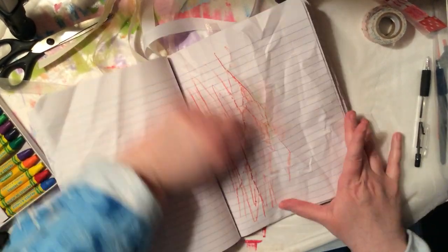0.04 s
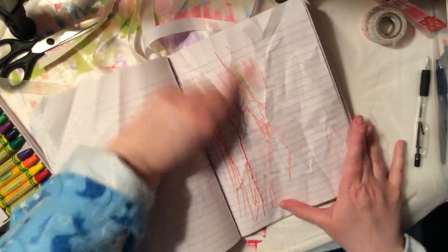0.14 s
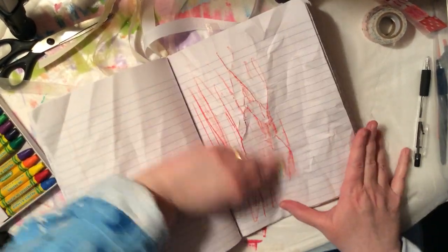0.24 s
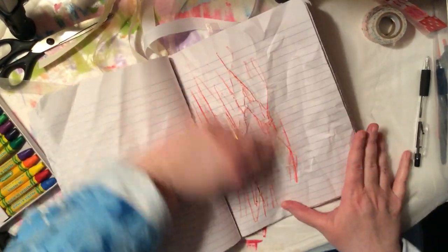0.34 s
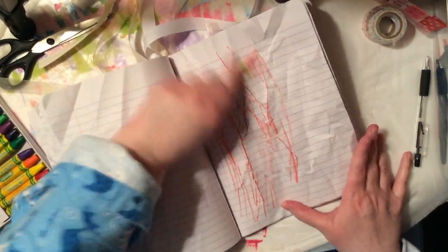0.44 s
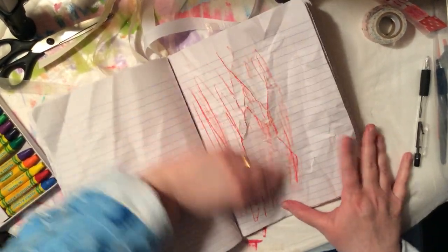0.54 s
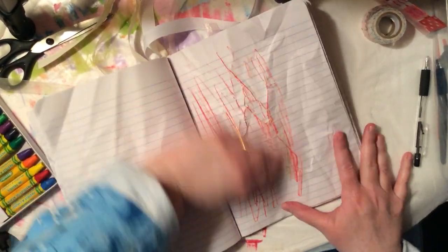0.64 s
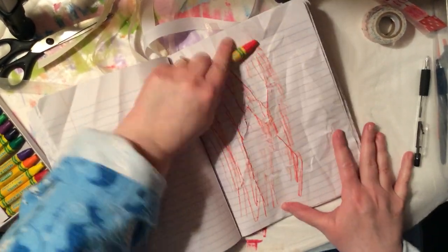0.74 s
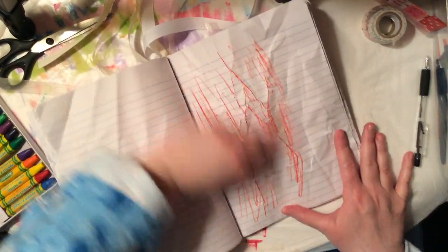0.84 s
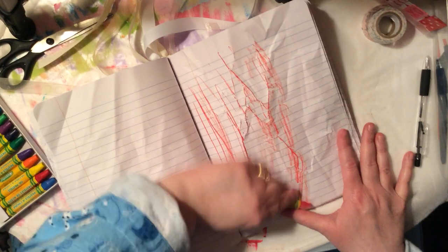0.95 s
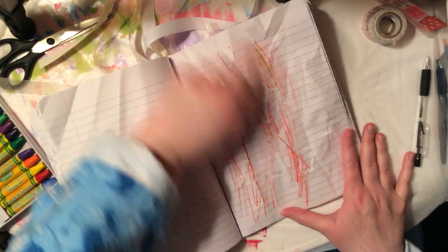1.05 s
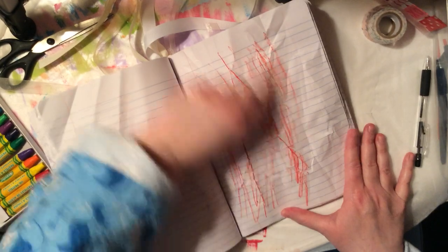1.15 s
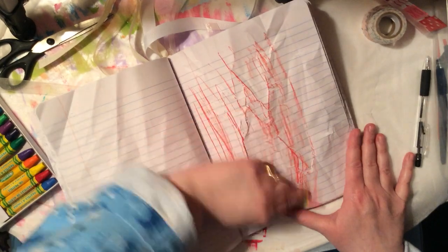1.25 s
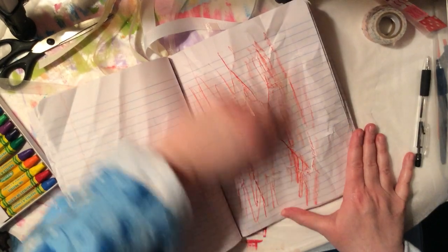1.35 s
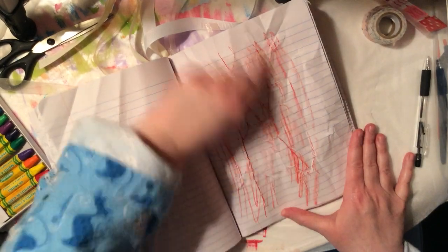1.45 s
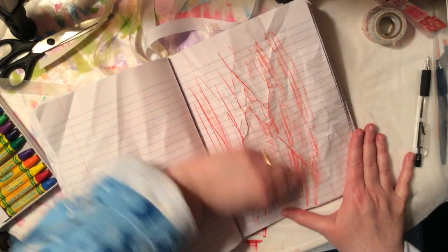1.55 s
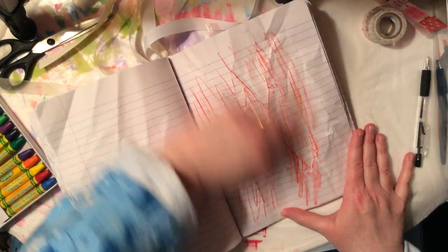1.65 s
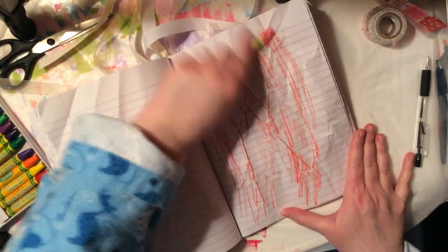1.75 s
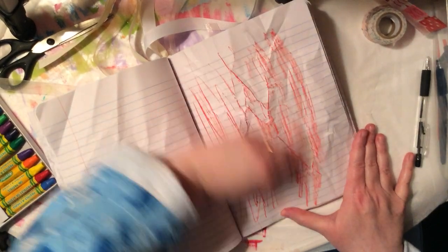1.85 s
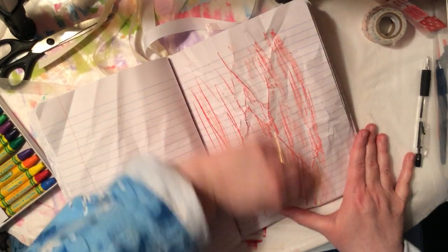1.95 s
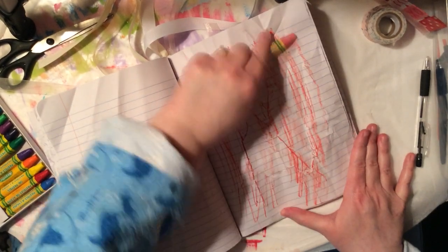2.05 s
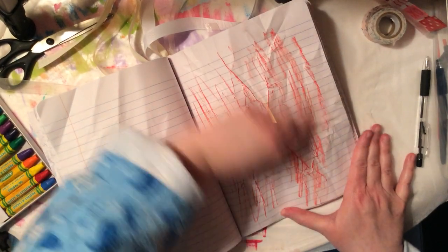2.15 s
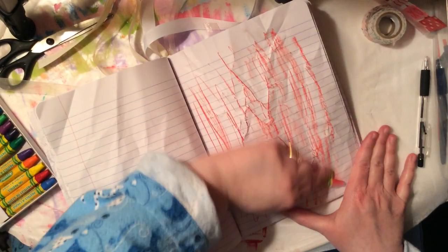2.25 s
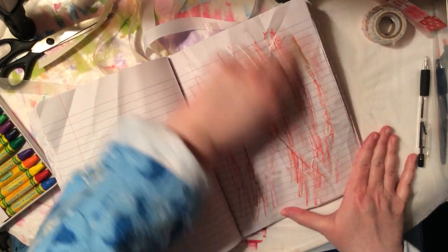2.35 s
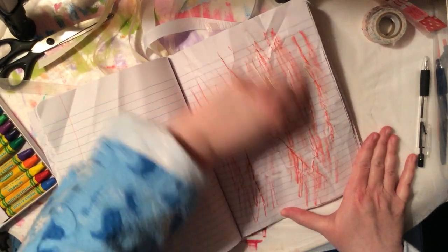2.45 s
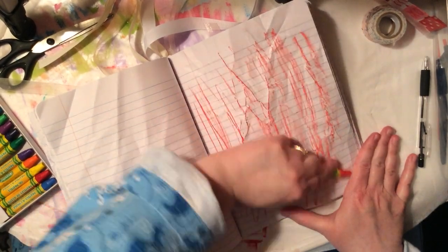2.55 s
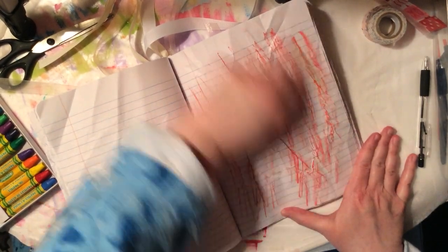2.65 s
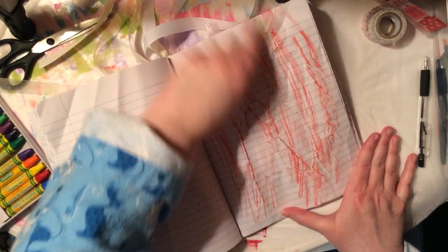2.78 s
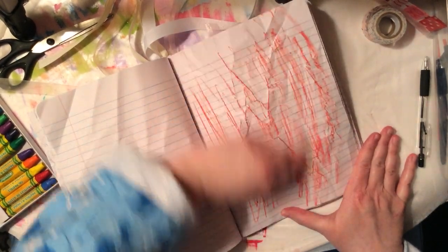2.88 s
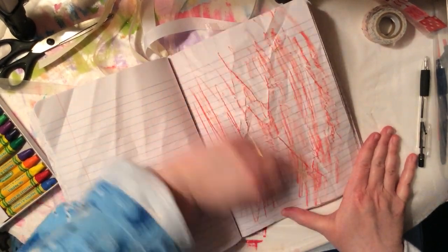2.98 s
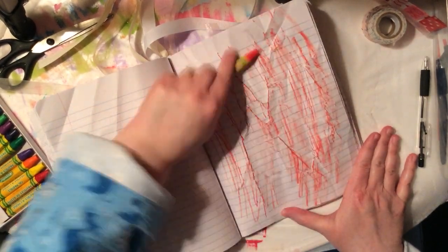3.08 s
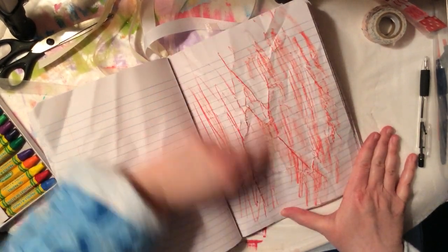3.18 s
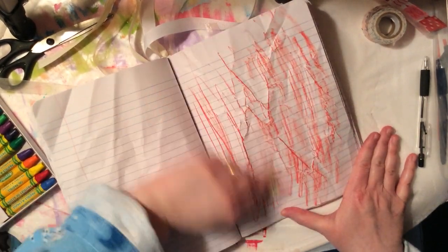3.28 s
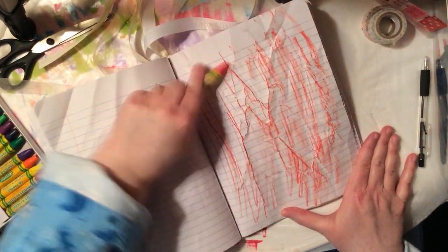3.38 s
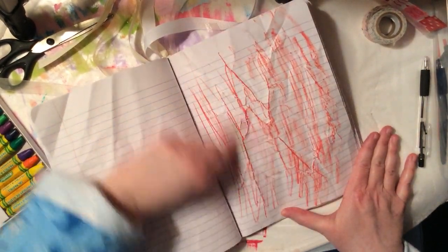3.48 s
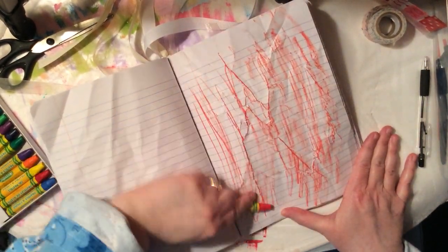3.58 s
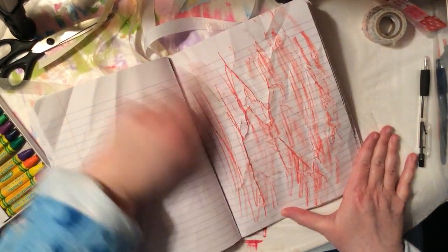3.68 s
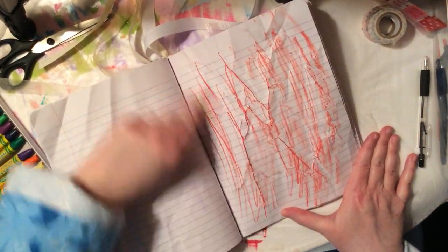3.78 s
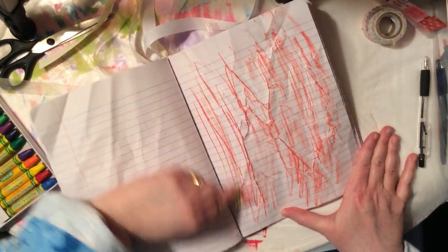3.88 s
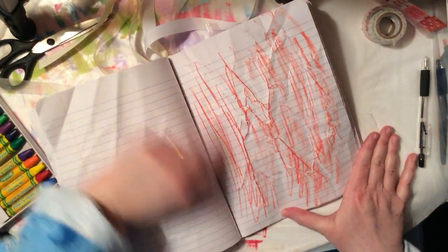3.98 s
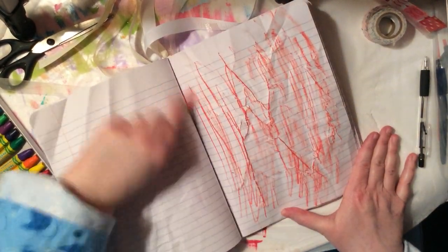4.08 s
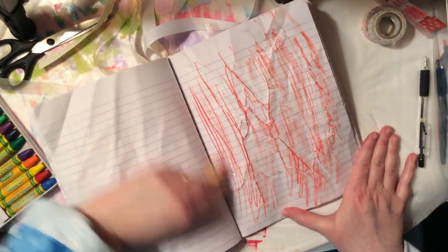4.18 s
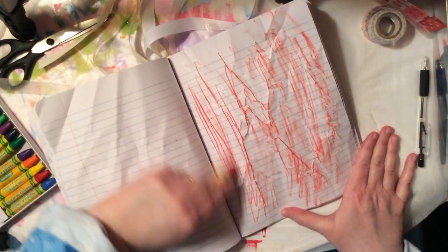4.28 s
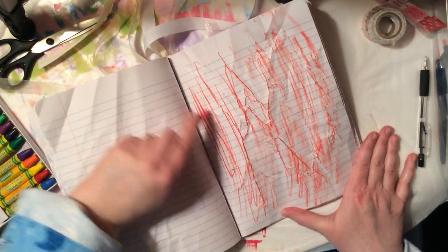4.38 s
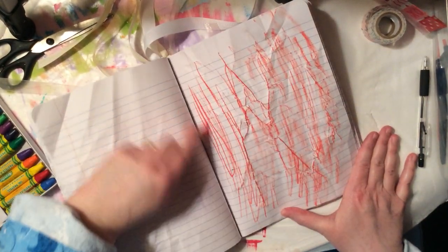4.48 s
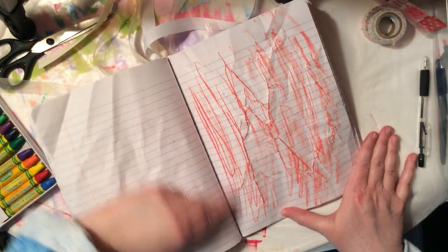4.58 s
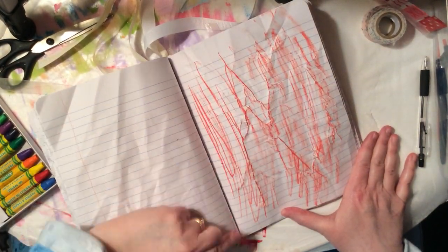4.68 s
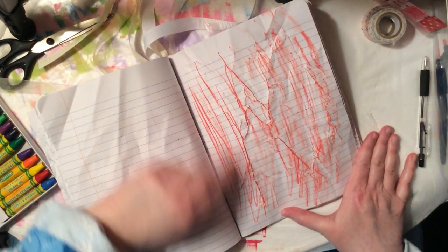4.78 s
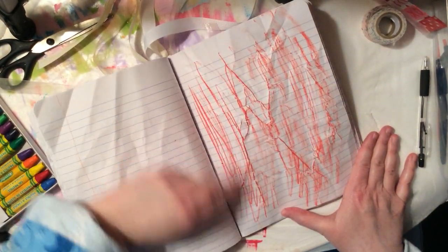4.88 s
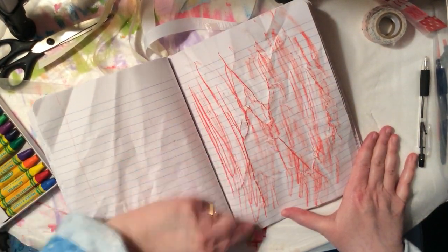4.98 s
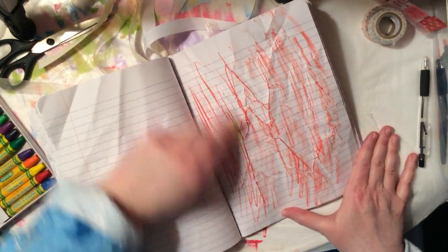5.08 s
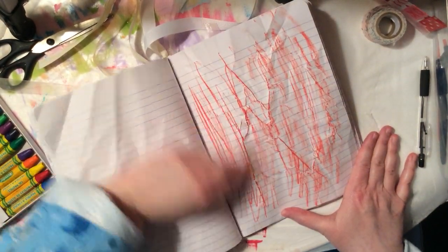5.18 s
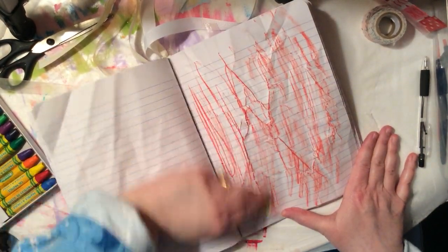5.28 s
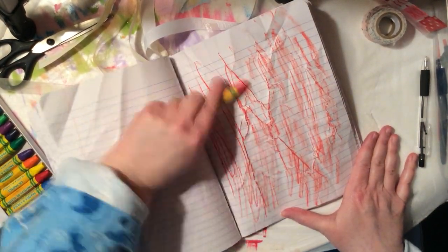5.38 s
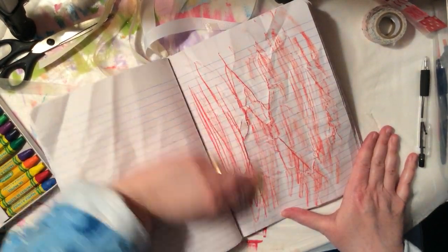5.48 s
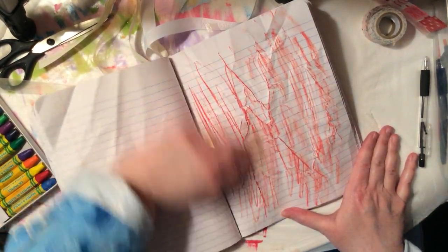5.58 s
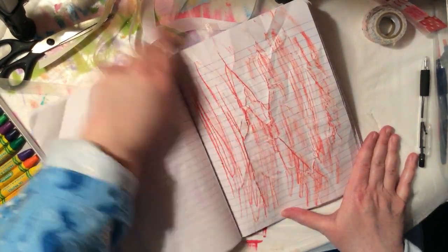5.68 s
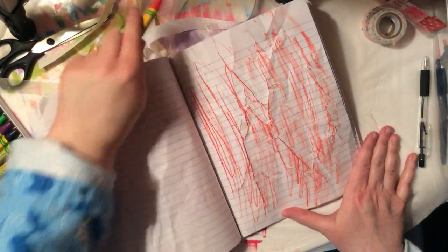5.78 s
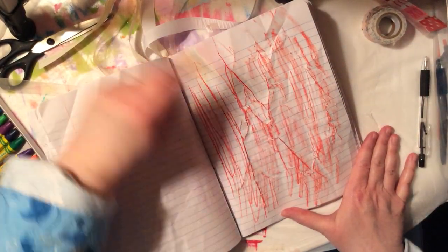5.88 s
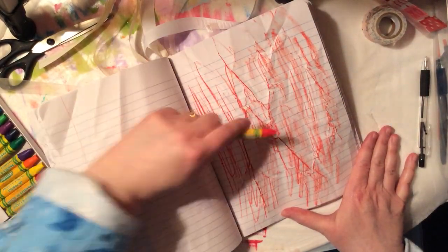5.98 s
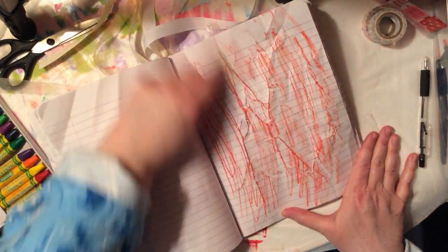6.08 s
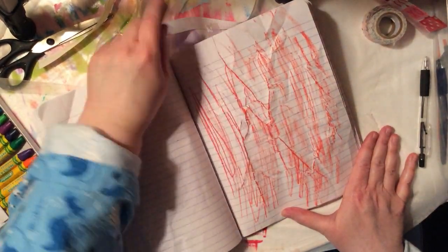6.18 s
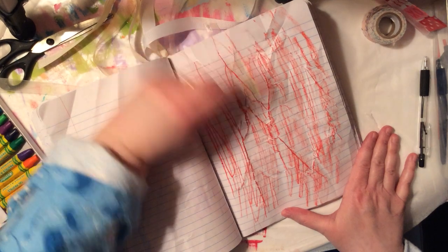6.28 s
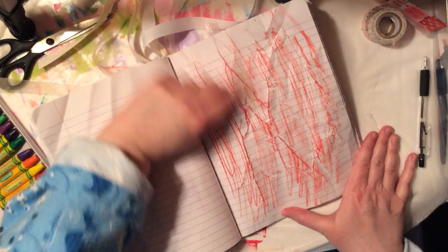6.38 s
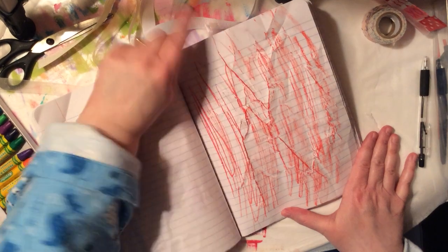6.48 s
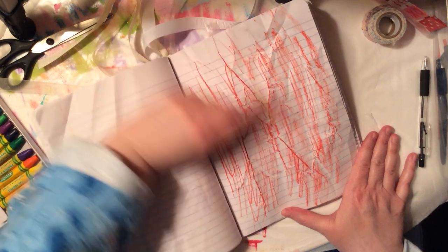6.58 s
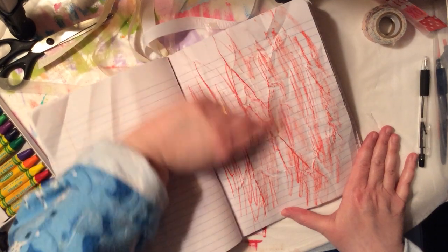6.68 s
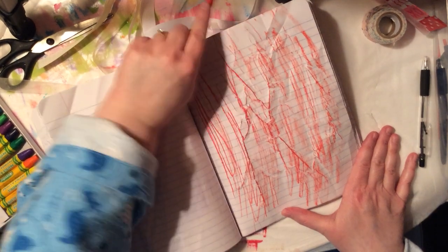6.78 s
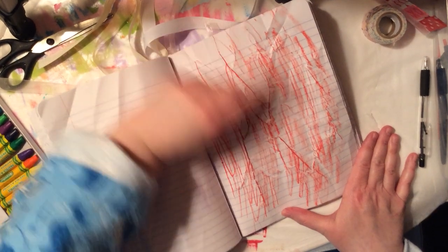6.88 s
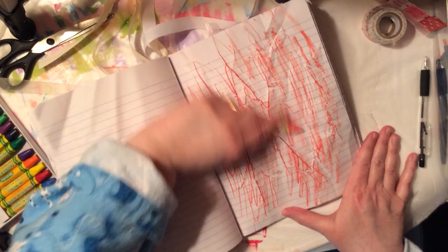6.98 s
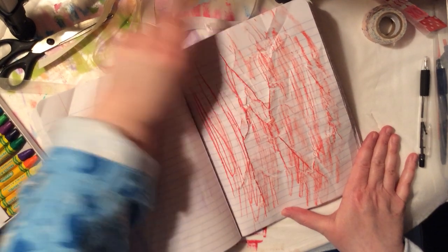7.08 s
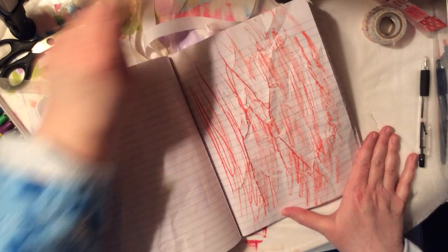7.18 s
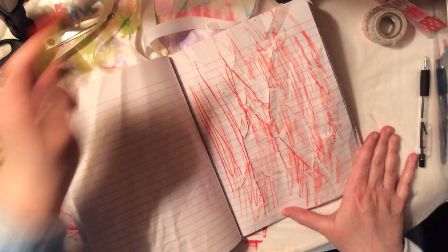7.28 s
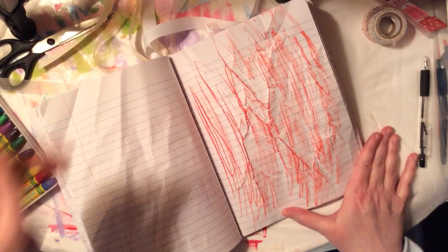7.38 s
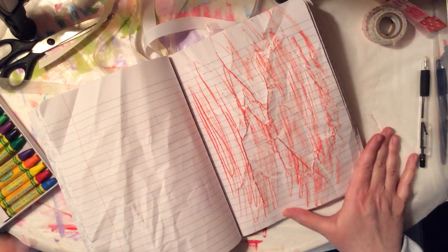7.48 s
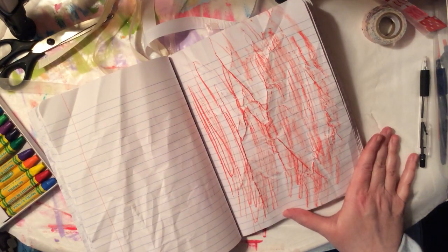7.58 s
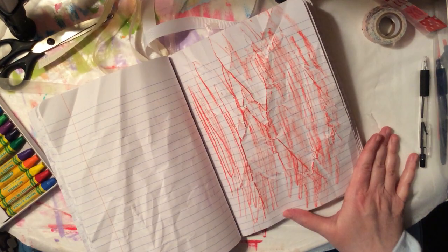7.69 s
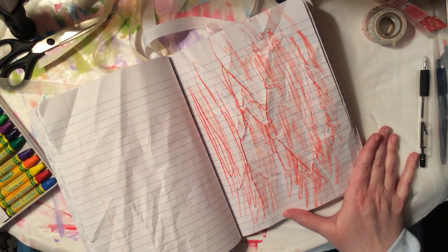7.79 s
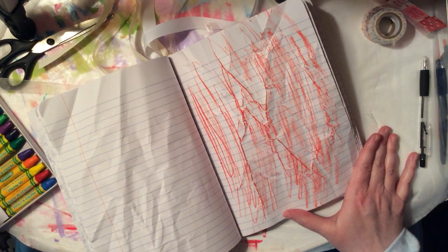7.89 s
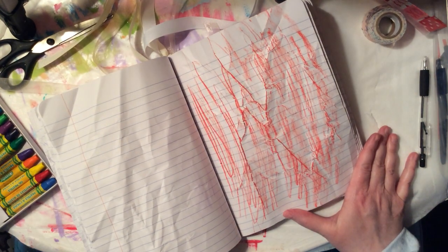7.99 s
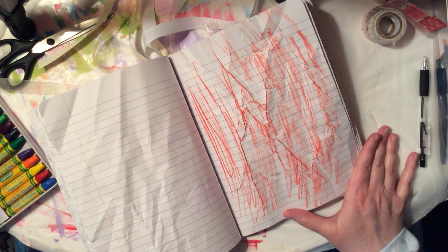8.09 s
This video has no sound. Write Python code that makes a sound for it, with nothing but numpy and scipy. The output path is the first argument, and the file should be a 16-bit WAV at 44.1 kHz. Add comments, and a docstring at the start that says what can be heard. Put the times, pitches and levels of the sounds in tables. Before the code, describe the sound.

Fast grainy scraping of a wax stick back and forth on wrinkled paper lying on a pad, with sharp little crackles on nearly every stroke. The steady rhythm breaks up midway into lighter, separated scratches, loose-page pats and low soft thumps. A few final firm strokes, then only tiny settling ticks over faint room air and a barely audible low hum. Very close, mostly dry, with a short indoor tail.

```python
"""An oil pastel is scribbled in fast sweeps over a crumpled notebook page on a desk, close to the microphone.
The wax sticks and slips on the paper's grain: random micro-slips, shaped by each sweep, ring tip, sheet and pad.
Creases snap as short bursts through one resonance; the loose page pats down and the hand thumps the desk.
Hand and sleeve rub as filtered grains between strokes; at the end the page settles in faint ticks.
Behind it lies a quiet room: filtered noise for the air and a faint hum of wavering pitch."""
import sys
import numpy as np
from scipy import signal
from scipy.fft import rfft, irfft
from scipy.io import wavfile

SR = 44100
rng = np.random.default_rng(int(sys.argv[2]) if len(sys.argv) > 2 else 0)


def bounce(signal):
    """Save signal as a 16-bit WAV file at the path given by the first command-line argument."""
    frames = np.transpose(np.atleast_2d(signal))
    limited = np.clip(frames, -1, 1)
    pcm = np.round(limited * 32767).astype(np.int16)
    wavfile.write(sys.argv[1], SR, pcm)


N = 358964
TIME = np.arange(N) / SR

# sweeps of the pastel: fastest moment [t/s], length [s], relative scratch [level/dB], extra on the pad [dB]
SWEEPS = [(0.049, 0.21, -39, 1), (0.169, 0.17, -33, -0.5), (0.336, 0.15, -33.5, 1), (0.418, 0.16, -38, -6),
          (0.513, 0.1, -36, 4), (0.649, .17, -36, 3.5), (0.812, 0.17, -38, 1.5), (0.975, .15, -32.5, 2),
          (1.164, 0.18, -41, 2.5), (1.329, 0.16, -39, 3), (1.476, 0.14, -40, 1.5),
          (1.644, 0.17, -37.5, -1.5), (1.791, 0.15, -41.5, -1.5), (1.971, 0.17, -38, 2),
          (2.127, 0.14, -37.5, 0.5), (2.302, 0.13, -32, -2.5), (2.448, 0.13, -37.5, -4.5),
          (2.635, .14, -35, 2), (2.774, .19, -43, -3.5), (2.987, .2, -39.5, 0), (3.158, 0.15, -35.5, -0.5),
          (3.304, .15, -34.5, 2), (3.46, 0.11, -37, 4.5), (3.624, 0.17, -32.5, -2.5), (3.785, 0.14, -36, 1),
          (3.966, .17, -40.5, -4), (4.274, 0.21, -49, 2.5), (4.61, .11, -50.5, -5), (4.708, .11, -42, -8),
          (5.016, 0.069, -52.5, -3), (5.202, 0.077, -40, -2.5), (5.322, 0.14, -40.5, 0.5),
          (5.472, 0.11, -40.5, 4), (5.604, .13, -39, 1.5), (5.747, .18, -36.5, -2.5), (5.856, 0.17, -61, 1),
          (6.223, .12, -41.5, 4), (6.519, 0.18, -41, 1), (6.838, 0.18, -35, -3.5), (7.145, 0.15, -35, 1)]
# resonances of the notebook on the desk: centre [f/Hz], width [Hz], lift [dB]
NOTEBOOK_MODES = [(135.7, 22, 10), (334, 18, 7), (586, 25, 6.5), (997, 32, 5), (1490, 140, 4.5),
                  (3365, 400, 1)]


def undb(db):
    """Decibels to gain."""
    return 10 ** (np.asarray(db) / 20)


def unit(x):
    """Scale to rms 1."""
    return x / np.sqrt(np.mean(x ** 2))


def add(track, s, sound):
    """Mix a sound into a track at time s."""
    i = max(int(s * SR), 0)
    track[i:i + len(sound)] += sound[:max(N - i, 0)]


def wander(rate):
    """Random motion of rms 1, drawn as straight lines between about `rate` random points a second."""
    point_s = np.cumsum(rng.uniform(.5, 1.5, N // 30)) / rate
    return unit(np.interp(TIME, point_s, rng.standard_normal(len(point_s))))


def response(points, modes=(), size=8192):
    """Minimum-phase impulse response of unit energy for a colour with resonances on top."""
    f = np.arange(size // 2 + 1) * SR / size + 1  # 1 Hz up, to keep the logarithm finite
    hz, colour_db = np.transpose(points)
    db = np.interp(np.log(f), np.log(hz), colour_db)
    for centre, width, lift in modes:
        db = db + lift / (1 + (2 * (f - centre) / width) ** 2)
    # folding the cepstrum onto positive time makes the response causal
    cepstrum = irfft(np.log(undb(db)))
    cepstrum[1:size // 2] *= 2
    cepstrum[size // 2 + 1:] = 0
    h = irfft(np.exp(rfft(cepstrum)))[:size // 2]
    return h / np.linalg.norm(h)


def ring(x, h):
    """Pass a sound through an impulse response."""
    return signal.oaconvolve(x, h)[:len(x)]


def burst(decay_s, spike, size=2048):
    """A quick run of tiny slips that builds and dies away; unit energy, more uneven with `spike`."""
    age = TIME[:size] / decay_s
    slips = rng.standard_normal(size) * np.exp(spike * rng.standard_normal(size))
    slips = slips * np.sqrt(age) * np.exp(-age)
    return slips / np.linalg.norm(slips)


def facet(x, hz, q):
    """The broad resonance of one small facet of crumpled paper, a second-order band-pass."""
    prewarped_fs = .5 / np.tan(np.pi * hz / SR)  # puts the peak exactly at hz
    b, a = signal.bilinear([1 / q, 0], [1, 1 / q, 1], fs=prewarped_fs)
    return signal.lfilter(b, a, x)


def grains(rate, spread_db):
    """Random micro-slips, `rate` a second, a few much bigger than the rest; rms 1."""
    when, luck, push = rng.random((int(rate * N / SR), 3)).T
    size = undb(spread_db * np.minimum(-np.log(1 - luck), 4))
    return unit(np.bincount((when * N).astype(int), size * np.sign(push - .5), N))


def crackle(rate, spread_db, decay_s, q, low_hz, high_hz, count=8):
    """Micro-slips spread over paper facets of different sizes, each with a short ring of its own; rms 1."""
    total = 0
    for hz in np.geomspace(low_hz, high_hz, count):
        facet_ring = facet(burst(decay_s, 0.32), hz, q)
        total = total + unit(ring(grains(rate / count, spread_db), facet_ring))
    return unit(total)


def background():
    """Still room air as filtered noise, and a low hum whose pitch and level waver."""
    # low hum before wavering: [t/s], pitch [f/Hz], [level/dB]
    hum_path = [(0, 92.9, -82), (4.5, 95.35, -75.5), (4.8, 97, -64.5), (5.851, 94, -75.5),
                (6.12, 91.7, -61.5), (6.351, 87.9, -68.5), (7.2, 80.9, -72.5), (8.14, 81.4, -75)]
    # colour of the room air: [f/Hz], relative [level/dB]
    air_colour = [(20, -36), (45, -6.5), (120, -9.5), (240, -19.5), (850, -29.5), (2000, -38.5),
                  (9000, -35.5), (16000, -59)]
    s, hz, db = np.transpose(hum_path)
    pitch = np.interp(TIME, s, hz) * (1 + 0.022 * wander(18))
    tone = unit(np.sin(2 * np.pi * np.cumsum(pitch) / SR))
    hum = tone * undb(np.interp(TIME, s, db) + 2.4 * wander(17))
    air = unit(ring(rng.standard_normal(N), response(air_colour)))
    return hum + undb(-70.5) * air


def brushing():
    """Hand and sleeve slide over the page: a soft rub with sparse crinkles."""
    # strength of the brushing: [t/s], relative [level/dB]
    brush_path = [(0, -53.5), (0.85, -58.5), (1.1, -59), (2.9, -58.5), (3.4, -57), (4.1, -53),
                  (4.48, -63.5), (4.7, -60), (4.9, -62.5), (5.15, -58.5), (5.86, -59.5), (5.96, -74.5),
                  (6.4, -72.5), (6.74, -54.5), (7, -69), (7.35, -75), (7.62, -70), (8.14, -87)]
    # colour of sleeve on paper: [f/Hz], relative [level/dB]
    sleeve_colour = [(100, -17.5), (300, -7), (600, 1.5), (1400, -7), (2400, -10.5), (4000, -4.5),
                     (9000, -3), (16000, -18.5)]
    level = undb(np.interp(TIME, *np.transpose(brush_path)) + 3.1 * wander(50))
    rub = unit(ring(grains(6000, spread_db=2.0), response(sleeve_colour, NOTEBOOK_MODES)))
    crinkles = crackle(98, spread_db=2.0, decay_s=0.00078, q=1.6, low_hz=710, high_hz=6000)
    return level * (undb(-4.5) * rub + undb(-5.0) * crinkles)


def settling(start_s=7.44, end_s=7.86):
    """Let go, the crumpled page relaxes in faint ticks spread over facets of different pitch."""
    ticks = crackle(39.8, spread_db=1.5, decay_s=0.0012, q=0.92, low_hz=597, high_hz=4200)
    return undb(-69.5) * ticks * ((TIME > start_s) & (TIME < end_s))


def blows(table, colour, decay_s, gain_db):
    """Soft contacts that ring the notebook: short noise bursts through its resonances."""
    out, body = np.zeros(N), response(colour, NOTEBOOK_MODES)
    for s, db in table:
        blow = ring(burst(decay_s, spike=0.38, size=4096), body)
        add(out, s, undb(db + gain_db) * blow / np.linalg.norm(blow))
    return out


def thumps():
    """The hand lands hard and thumps the desk, a low-coloured blow."""
    # landings of the hand: [t/s], relative [level/dB]
    landings = [(1.457, -39), (3.425, -37), (3.925, -39.5), (5.577, -47), (6.465, -34.5), (6.764, -38.5),
                (7.088, -29.5)]
    # colour of a thump: [f/Hz], relative [level/dB]
    thump_colour = [(30, -16), (80, 1.5), (145, -15), (320, 1.5), (750, 0), (2000, -29.5)]
    return blows(landings, thump_colour, decay_s=0.0042, gain_db=19)


def pats():
    """The loose page pats the sheets under it, a shorter and brighter blow."""
    # touches of the page: [t/s], relative [level/dB]
    touches = [(0.74, -37), (0.75, -30.5), (0.762, -34), (0.772, -28.5), (1.742, -34), (3.826, -32),
               (3.904, -32), (4.321, -34.5), (4.59, -34.5), (4.606, -31), (4.661, -35.5), (4.807, -37.5),
               (4.916, -47.5), (5.177, -28), (5.794, -29), (5.85, -36), (6.086, -52.5), (6.314, -42),
               (6.623, -45), (6.659, -49), (6.77, -30), (6.997, -49), (7.29, -50), (7.925, -59.5)]
    # colour of a pat: [f/Hz], relative [level/dB]
    pat_colour = [(100, -23.5), (350, -16), (580, -2.5), (1000, -4), (1500, 3), (1950, -8), (3500, -10),
                  (16000, -34)]
    return blows(touches, pat_colour, decay_s=0.0012, gain_db=17)


def chance_snaps(count=6):
    """Creases give way by chance along a sweep: more in a long one, louder in a firm one."""
    rate_per_s, reach = 13, .65  # reach: middle share of the sweep in which they fall
    level_db, scatter_db, middle_hz = -1, 1.5, 4500  # level re the sweep's scratch level
    rows = []
    chances = rng.random((len(SWEEPS), count, 4))
    for (fastest, length, db, _), tries in zip(SWEEPS, chances):
        for luck, place, strength, size in tries:
            if luck < rate_per_s * length / count:
                s = fastest + reach * length * (place - .5)
                snap_db = db + level_db + scatter_db * (2 * strength - 1)
                rows.append((s, snap_db, middle_hz * 2 ** (size - .5)))
    return rows


def creases():
    """Creases give way with a crack a few milliseconds long; small facets sound brighter."""
    # clear single snaps, from loud cracks to faint late ticks: [t/s], rms over 4 ms [level/dB], brightness [f/Hz]
    single_snaps = [(0.0226, -24, 6200), (0.0631, -25, 4760), (0.145, -28, 5060), (0.1651, -27, 7400),
                    (0.3142, -29, 4900), (0.3352, -27.5, 5500), (0.4117, -30, 4640), (0.4812, -29.5, 4200),
                    (0.5161, -27.5, 6000), (0.663, -32.5, 5780), (0.6731, -24, 6040), (0.7621, -30, 2810),
                    (0.7842, -27.5, 5290), (0.8234, -27, 5900), (0.9585, -27.5, 6280), (1.1928, -32, 5270),
                    (1.2028, -34.5, 4600), (1.2616, -34, 4750), (1.359, -32, 6240), (1.6657, -27, 5170),
                    (1.7418, -33, 3900), (1.766, -30, 4500), (1.9063, -31.5, 5600), (1.9879, -29.5, 4190),
                    (2.0772, -37.5, 3577), (2.1065, -30, 4840), (2.1266, -27.5, 5960),
                    (2.2496, -29.5, 5040), (2.2873, -32, 4800), (2.6214, -26.5, 6330), (3.0982, -31, 6250),
                    (3.1235, -34, 4000), (3.3024, -26, 6120), (3.4245, -33.5, 3400), (3.4744, -29, 4460),
                    (3.5567, -35.5, 2800), (3.5815, -34, 3516), (3.5941, -25, 4154), (3.7301, -31.5, 4520),
                    (3.7534, -28.5, 6400), (3.7724, -30, 4700), (3.8673, -38.5, 5040), (3.935, -30, 5770),
                    (3.989, -24.5, 5520), (4.096, -33, 4840), (4.3015, -41.5, 6100), (4.3929, -42, 2400),
                    (4.41, -42.5, 2470), (4.5279, -44.5, 3100), (4.7068, -29, 6180), (5.0041, -32, 4900),
                    (5.2798, -25.5, 5310), (5.2908, -26, 5440), (5.3573, -32.5, 4700),
                    (5.4798, -31.5, 4050), (5.5779, -21.5, 7200), (5.694, -27.5, 4580), (5.7254, -27, 4990),
                    (6.1699, -46, 2350), (6.198, -36, 3960), (6.244, -35, 4060), (6.473, -31, 4200),
                    (6.5123, -32, 5090), (6.7638, -34, 4220), (6.7711, -28, 6100), (6.806, -34.5, 6080),
                    (6.821, -24, 4324), (6.8313, -23, 4640), (6.8994, -40, 5410), (7.0904, -30, 2850),
                    (7.0967, -32.5, 3550), (7.1224, -28, 4250), (7.1365, -25.5, 4460),
                    (7.4142, -61.5, 7560), (7.631, -52, 4793), (7.6701, -48, 4300), (7.836, -49.5, 3930)]
    # colour of creased paper: [f/Hz], relative [level/dB]
    crease_colour = [(100, -17), (400, 3), (950, 0), (1500, -0.5), (2400, -6.5), (3300, -5), (4800, -2.5),
                     (6200, -6.5), (8300, -3), (12000, -6.5), (16000, -12.5)]
    out, paper = np.zeros(N), response(crease_colour, NOTEBOOK_MODES)
    span_s = .004  # the level is the crack's energy averaged over this time
    for s, db, hz in single_snaps + chance_snaps():
        crack = burst(decay_s=0.00099, spike=0.23) + undb(-7.5) * burst(decay_s=0.0041, spike=0.42)
        crack = ring(facet(crack, hz, q=0.97) + undb(-19) * crack, paper)
        add(out, s, undb(db) * crack * np.sqrt(span_s * SR) / np.linalg.norm(crack))
    return out


def sweep(fastest, length):
    """The hand speeds up and slows like half a swing; power at the tip, 0-1."""
    swell = 3.75  # power grows as speed ** swell
    out = np.zeros(N)
    on = slice(*np.searchsorted(TIME, [fastest - length / 2, fastest + length / 2]))
    speed = np.abs(np.cos(np.pi * (TIME[on] - fastest) / length))
    out[on] = speed ** swell
    return out


def drive():
    """Amplitudes of tip, sheet and pad: a firmer sweep raises the scratch most, so light ones sound hollow."""
    # how loosely the page lies under the tip: [t/s], lift of the sheet's sound [dB]
    slack = [(0, 1.5), (0.8, 1), (1.2, -2), (2.3, -1), (2.7, -4.5), (3.6, 2.5), (4.6, -0.5), (5.5, -.5),
             (6.3, 4.5), (7.1, -1.5)]
    firm_db = -36.5  # scratch of an ordinary sweep
    sheet_db, sheet_growth = -44, 0.65  # relative level in an ordinary sweep; dB gained per dB of scratch
    pad_db, pad_growth = -52, 0.83  # the same for the pad under the sheet
    press_lead_s = 0.0054  # the hand bears down on the pad just before it is fastest
    tip = sheet = pad = 0
    for fastest, length, db, weight_db in SWEEPS:
        power = sweep(fastest, length)
        press = sweep(fastest - press_lead_s, length)
        firmness_db = db - firm_db
        tip = tip + power * undb(db) ** 2
        sheet = sheet + power * undb(sheet_db + sheet_growth * firmness_db) ** 2
        pad = pad + press * undb(pad_db + pad_growth * firmness_db + weight_db) ** 2
    looseness = undb(np.interp(TIME, *np.transpose(slack)))
    return np.sqrt(tip), np.sqrt(sheet) * looseness, np.sqrt(pad)


def page_edge(x, lag_s, echo):
    """The page's edge reflects the vibration; the lag wanders as the tip travels, so the colour keeps changing."""
    lag = lag_s * np.exp(0.3445 * wander(12))
    return unit(x + echo * np.interp(TIME - lag, TIME, x))


def pastel():
    """Each sweep speeds up and slows; the wax catches and lets go, hissing at the tip and driving sheet and pad."""
    # colour of the scratch at the tip: [f/Hz], relative [level/dB]
    scratch_colour = [(1200, -33.5), (2400, -11), (3200, 2.5), (4000, -1), (4800, 1), (6200, -1), (8200, 0),
                      (9500, -1.5), (12000, -7), (16000, -16)]
    # colour of the fluttering sheet: [f/Hz], relative [level/dB]
    sheet_colour = [(200, -26.5), (450, -1), (640, -0.5), (1000, -2.5), (1600, -3.5), (2300, -1.5),
                    (3200, -15), (6000, -35)]
    # colour of the pad underneath: [f/Hz], relative [level/dB]
    pad_colour = [(30, -23.5), (75, -10.5), (135, -3), (260, -9), (420, 6), (520, -5.5), (800, -17.5),
                  (2000, -57.5)]
    tip, sheet, pad = drive()
    # the grip changes from ridge to ridge, and now and then the wax catches hard
    grip = unit(undb(3.45 * wander(200) + 1.14 * wander(70)))
    catches = ring(grains(150, spread_db=3.0), burst(decay_s=0.0005, spike=0.54))
    slips = unit(grip * grains(7000, spread_db=2.0) + undb(-4.0) * catches)
    # small facets crackle brightly; large ones flap with a hollow ring
    fine = grip * crackle(1300, spread_db=5.0, decay_s=0.00075, q=2.0, low_hz=2760, high_hz=9800)
    flaps = grip * crackle(600, spread_db=3.5, decay_s=0.00071, q=2.48, low_hz=799, high_hz=2230)
    scratch = ring(slips + undb(1.5) * fine, response(scratch_colour, NOTEBOOK_MODES))
    flutter = ring(slips + undb(-1.5) * flaps, response(sheet_colour, NOTEBOOK_MODES))
    shaking = unit(ring(slips, response(pad_colour, NOTEBOOK_MODES)))
    scratch = page_edge(scratch, lag_s=0.000705, echo=0.29)
    flutter = page_edge(flutter, lag_s=0.00221, echo=0.37)
    return undb(-1.9) * tip * scratch + undb(0.83) * sheet * flutter + undb(-0.4) * pad * shaking


def room(x, t60_s, wet_db, early_db, damp_hz):
    """Early echoes from the cluttered desk, then the short, duller tail of the walls, both decaying noise."""
    t = TIME[:SR // 2]
    early = rng.standard_normal(len(t)) * (t > .002) * np.exp(-t / 0.0053)
    early = early / np.linalg.norm(early)
    tail = rng.standard_normal(len(t)) * (t > .007) * np.exp(-np.log(1000) * t / t60_s)
    tail = tail / np.linalg.norm(tail)  # wet_db applies to the tail before its treble is damped
    tail = signal.sosfilt(signal.butter(1, damp_hz, fs=SR, output="sos"), tail)
    return x + ring(x, undb(early_db) * early + undb(wet_db) * tail)


def scene():
    """Everything on the desk, heard in the room."""
    desk = brushing() + settling() + thumps() + pats() + creases() + pastel()
    heard = room(desk, t60_s=0.3, wet_db=-17.5, early_db=-14.5, damp_hz=4500)
    return (background() + heard)[None]


def record(dry):
    """The recorder cuts the top steeply above 16.1 kHz."""
    return signal.sosfilt(signal.ellip(10, .2, 70, 16100, fs=SR, output="sos"), dry)


dry = scene()
out = record(dry)
bounce(out)
```